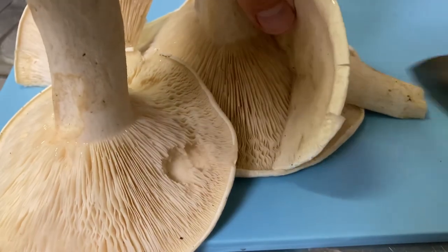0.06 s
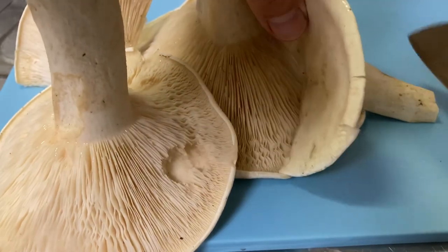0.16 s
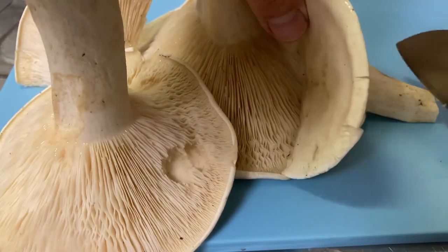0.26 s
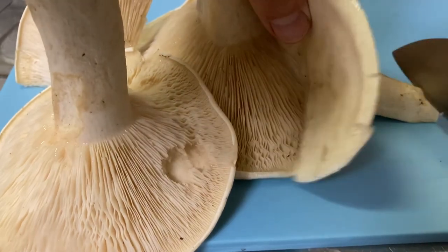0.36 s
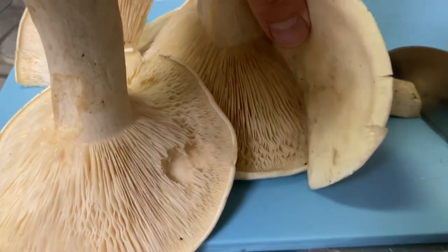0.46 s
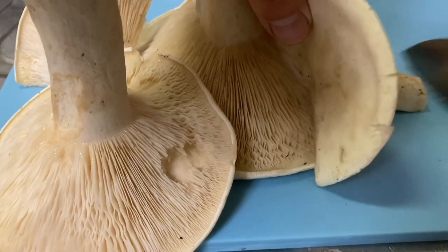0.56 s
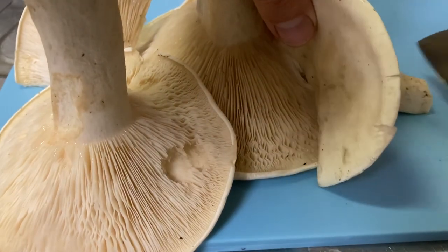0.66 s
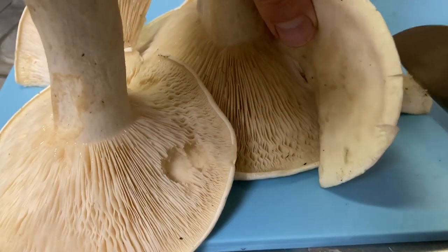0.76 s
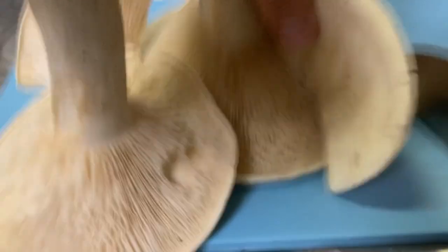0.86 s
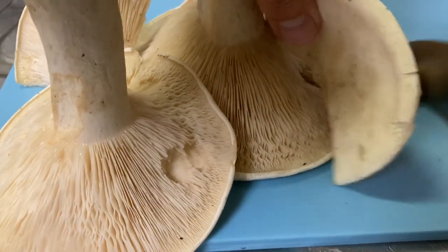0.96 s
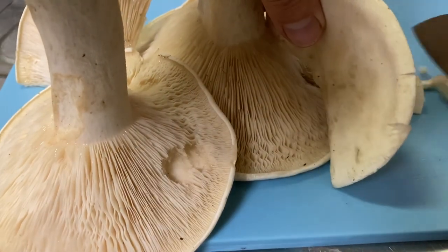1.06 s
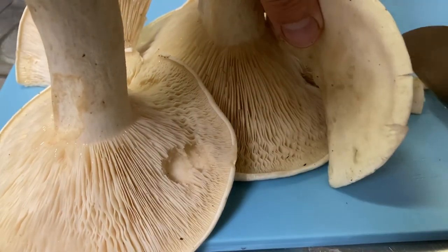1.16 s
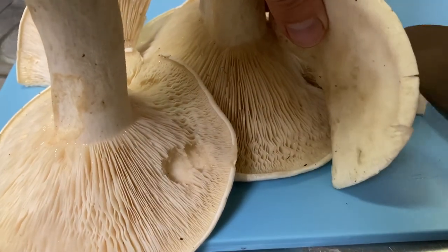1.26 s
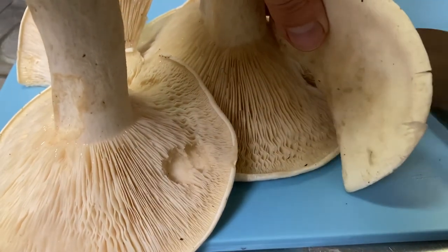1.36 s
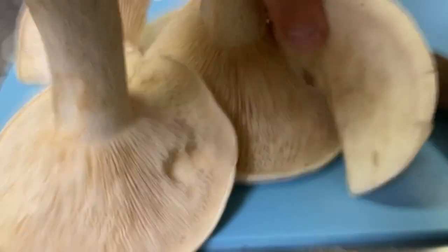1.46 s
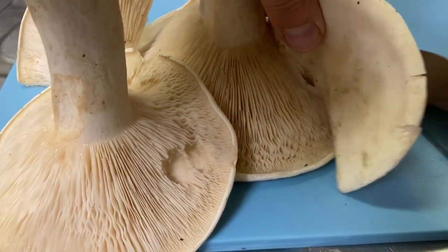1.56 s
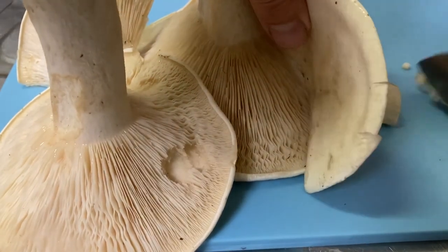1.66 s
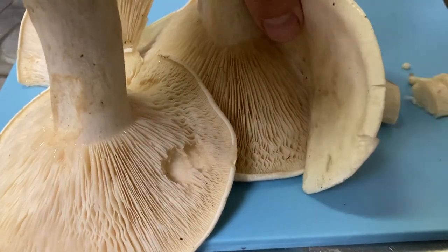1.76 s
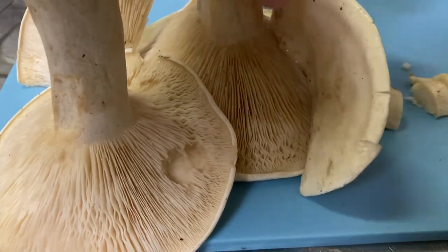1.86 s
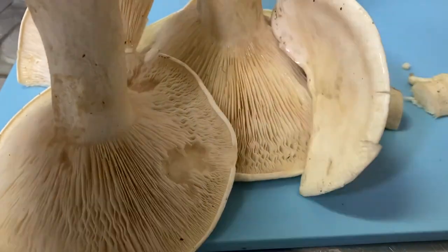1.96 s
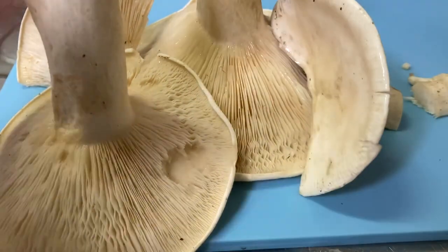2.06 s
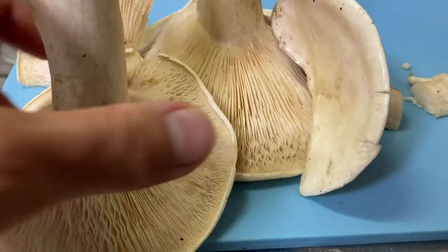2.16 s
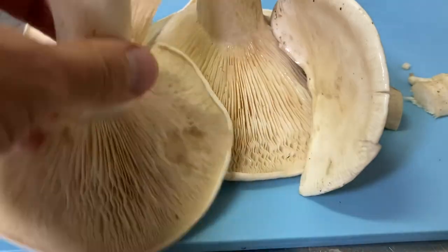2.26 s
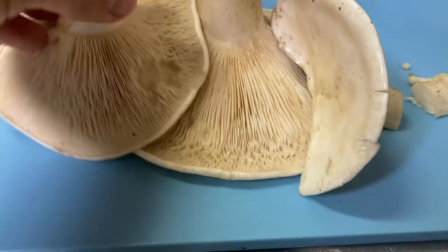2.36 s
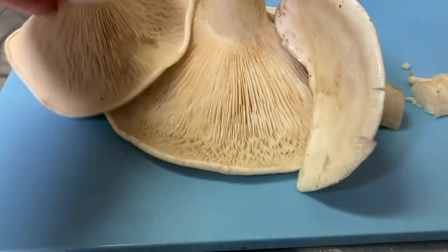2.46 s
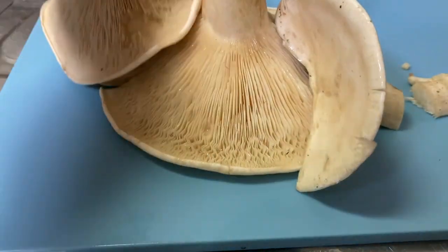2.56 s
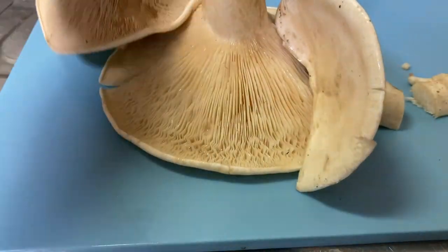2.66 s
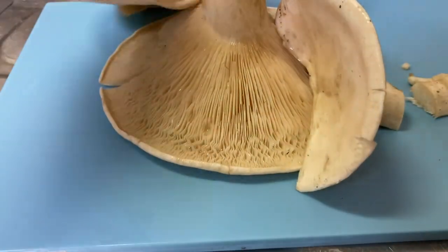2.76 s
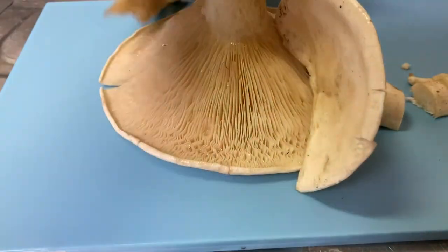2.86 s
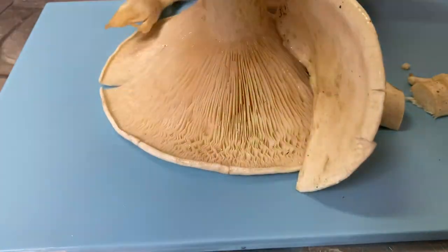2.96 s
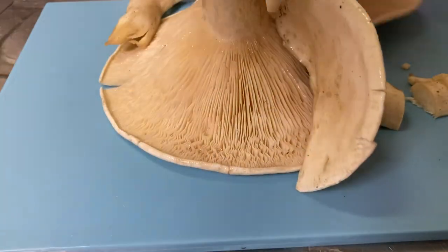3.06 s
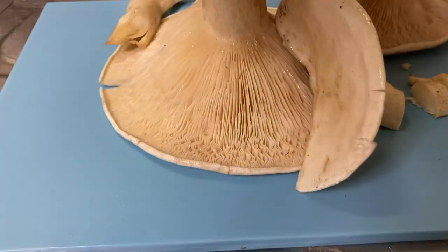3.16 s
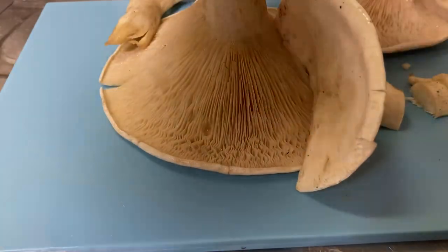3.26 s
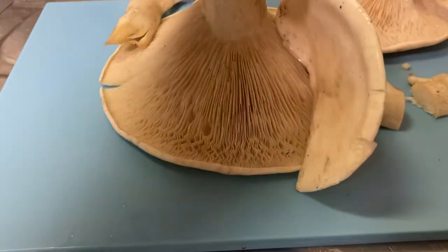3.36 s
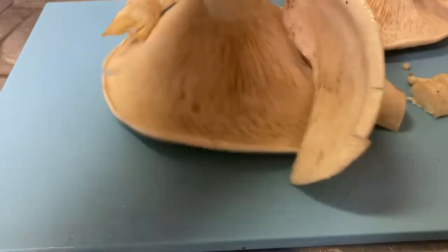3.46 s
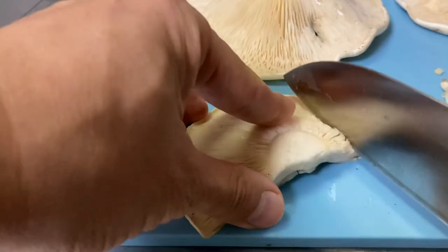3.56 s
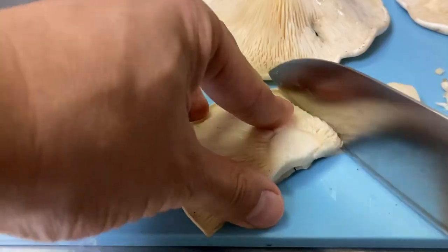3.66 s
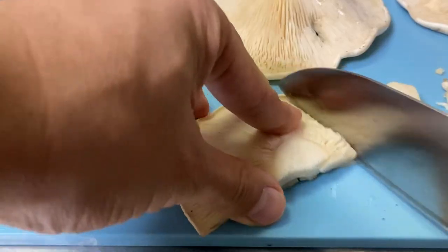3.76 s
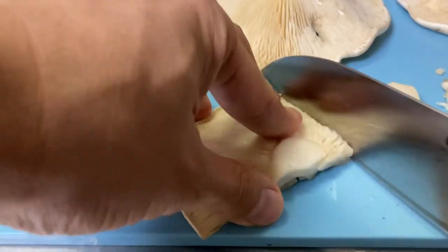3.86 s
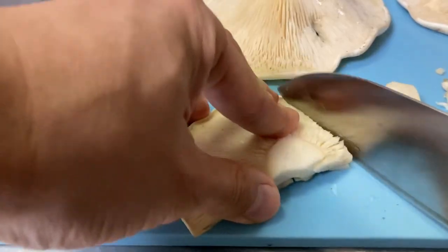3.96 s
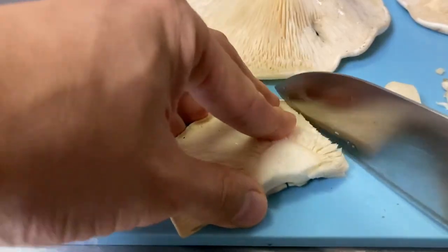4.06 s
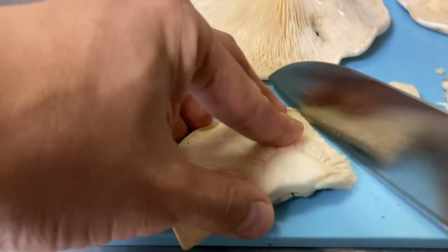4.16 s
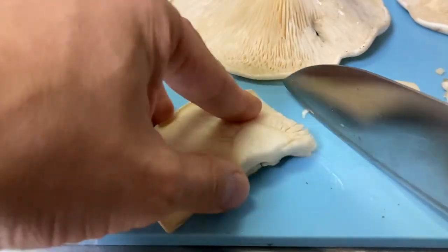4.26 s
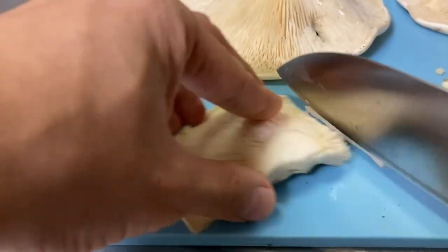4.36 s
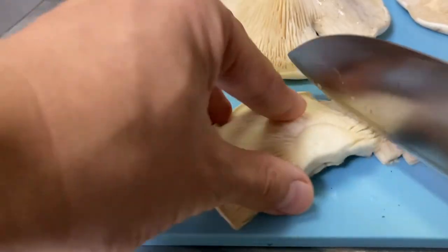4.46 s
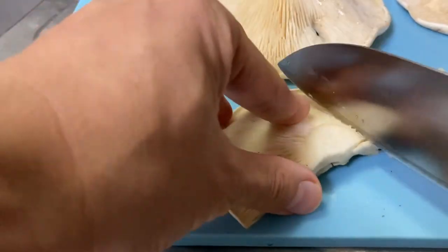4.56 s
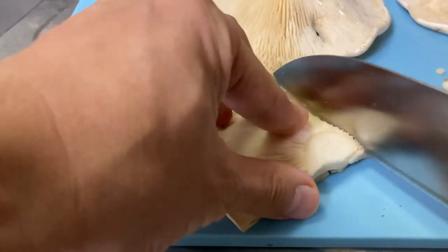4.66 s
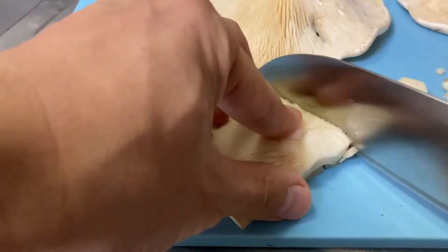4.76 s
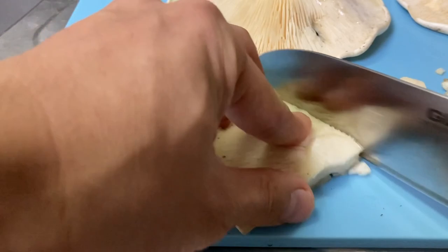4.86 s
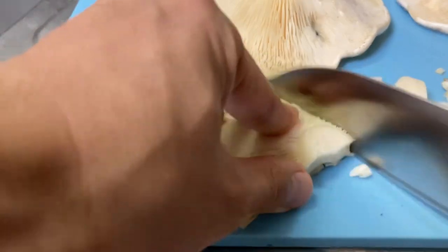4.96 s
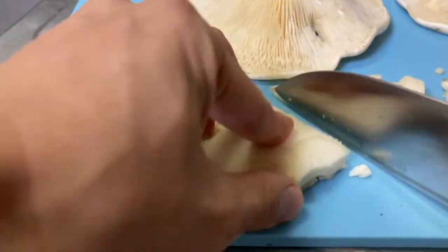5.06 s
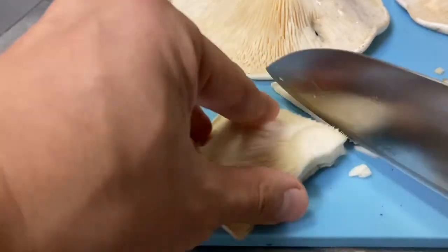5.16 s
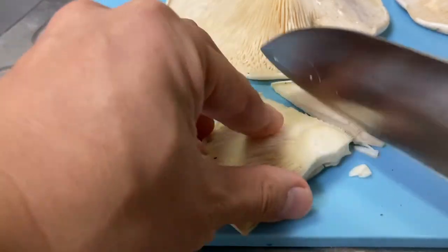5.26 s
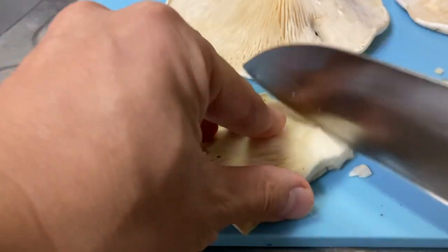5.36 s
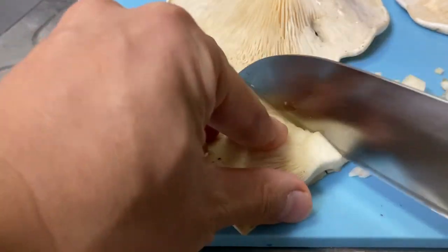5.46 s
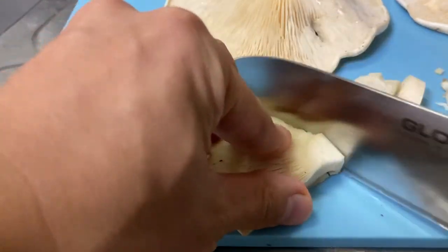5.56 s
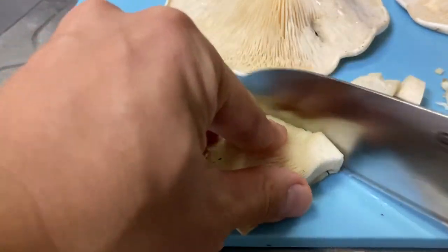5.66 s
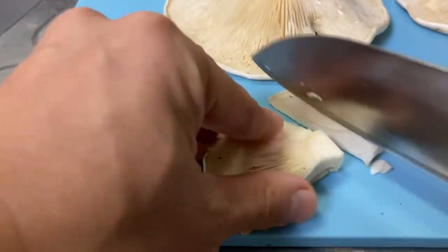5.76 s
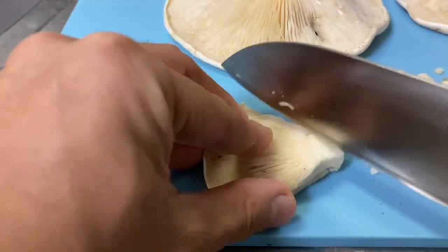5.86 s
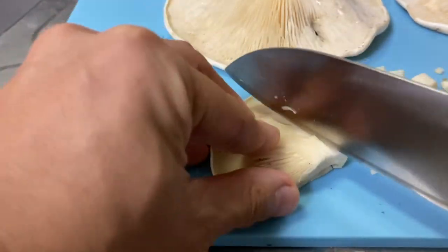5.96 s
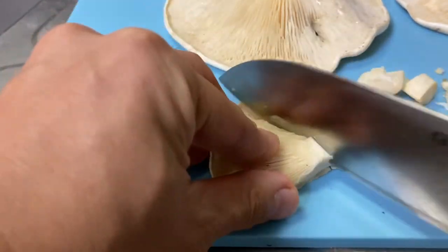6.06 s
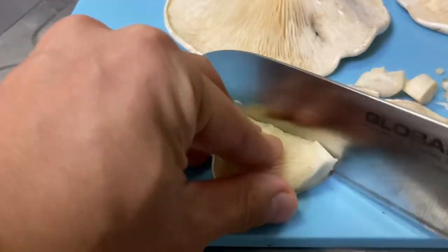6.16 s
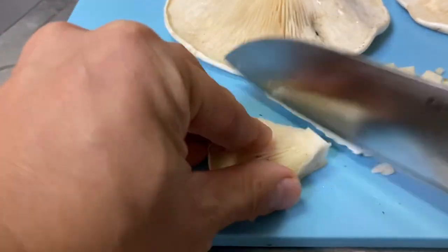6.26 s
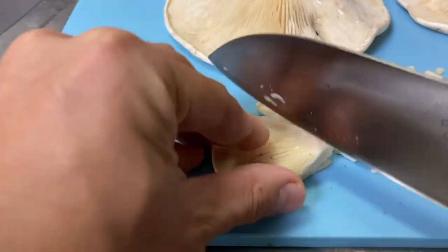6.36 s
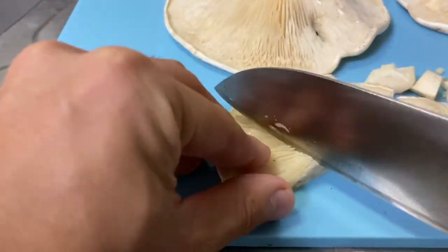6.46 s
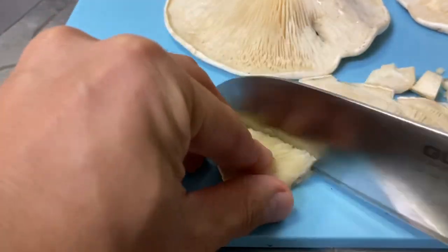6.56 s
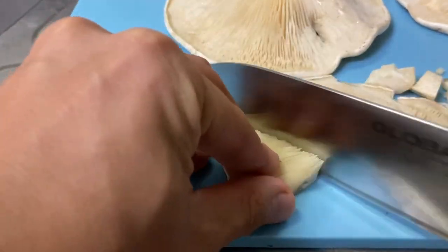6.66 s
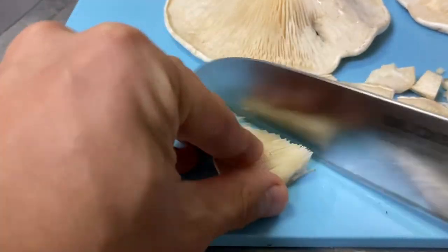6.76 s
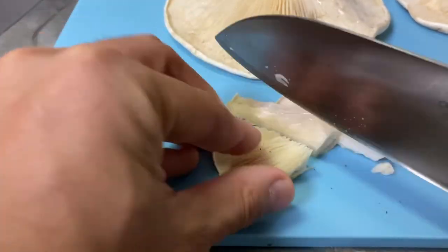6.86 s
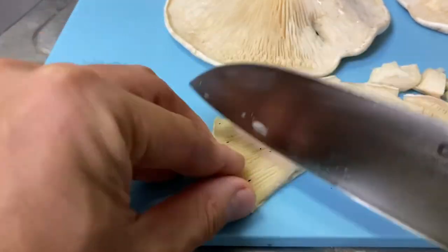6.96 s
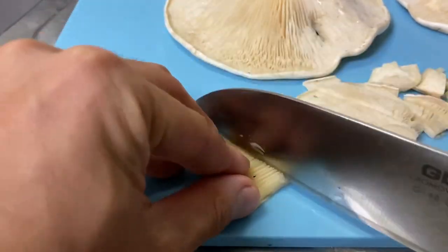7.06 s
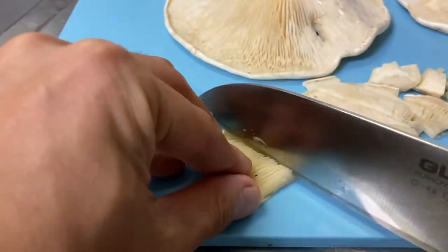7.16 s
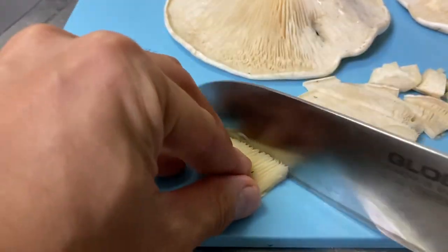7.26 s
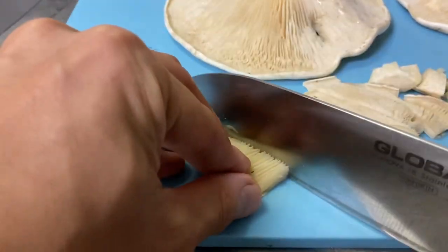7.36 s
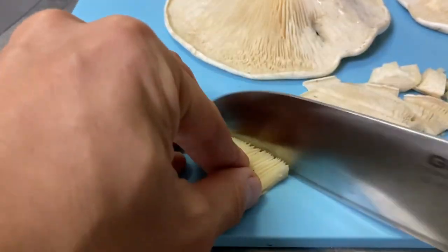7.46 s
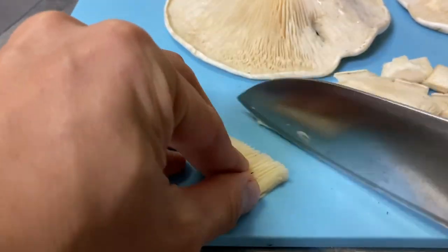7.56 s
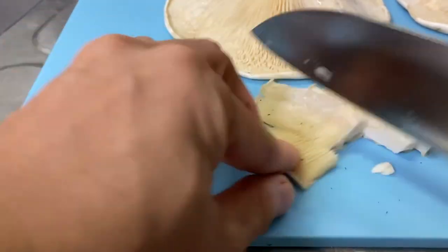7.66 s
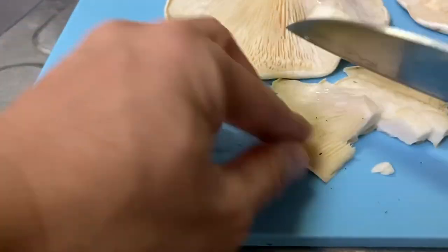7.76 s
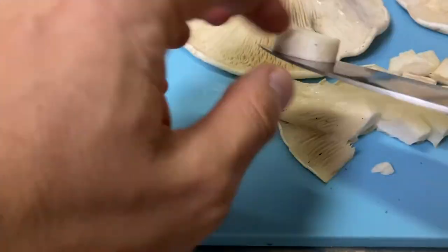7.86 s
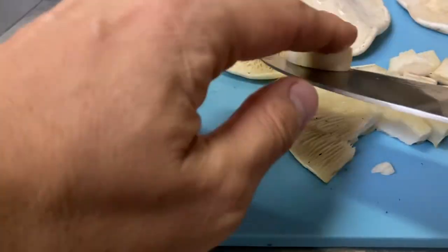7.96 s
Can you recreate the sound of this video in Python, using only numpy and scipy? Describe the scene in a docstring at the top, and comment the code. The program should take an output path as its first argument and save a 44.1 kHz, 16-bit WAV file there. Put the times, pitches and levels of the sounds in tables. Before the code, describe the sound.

A ringing knife chops hard on a plastic cutting board, rests over faint fridge hum, then slices mushroom with soft crunches, knocks and short scrapes.

```python
"""Slicing mushrooms on a plastic board

A chef's knife works close by in a small quiet kitchen: the ring of an earlier cut, then three hard
chops near the board's edge and six slices towards its middle. Blows excite decaying modes of board and
blade; stick-slip noise makes the dragging hiss and short creak; random grains make the flesh crunch.
Fingers shift the caps between the runs, the level dips briefly, and a refrigerator hums throughout."""
import sys
import numpy as np
from scipy import signal
from scipy.fft import rfft, irfft, next_fast_len
from scipy.io import wavfile
from scipy.ndimage import uniform_filter1d, map_coordinates

SR = 44100
rng = np.random.default_rng(int(sys.argv[2]) if len(sys.argv) > 2 else 0)


def dump(signal):
    """Clip the signal to [-1, 1] and save it as 16-bit WAV at the path in sys.argv[1]."""
    limited = np.clip(np.atleast_2d(signal).T, -1, 1)
    pcm = np.round(limited * 32767).astype(np.int16)
    wavfile.write(sys.argv[1], SR, pcm)


N = 353682
TIME = np.arange(N) / SR  # s, the whole scene
AGE = TIME[:SR * 3 // 4]  # s, since a single blow


def amp(db):
    """Level to gain: 20 dB is a factor of ten in amplitude."""
    return 10 ** (np.asarray(db) / 20)


def unit(x):
    """Normalisation by mean power: scale to rms 1."""
    return x / np.sqrt(np.mean(x ** 2) + 1e-20)


def strength(x):
    """Energy equivalence: the rms of a blow if all its energy fell into 10 ms."""
    return np.sqrt(np.sum(x ** 2) / (SR / 100))


def full(sound):
    """Energy normalisation: a short sound at unit strength, followed by silence."""
    return np.pad(sound / strength(sound), (0, len(AGE) - len(sound)))


def along(points, hz):
    """Logarithmic frequency scale: interpolate (frequency [Hz], value) points."""
    point_hz, values = np.transpose(points)
    return np.interp(np.log(hz + 1), np.log(point_hz), values)


def filtered(x, response):
    """Linear filtering: multiply the spectrum of x by a response of frequency."""
    n = x.shape[-1]
    padded = next_fast_len(n + SR // 8)
    spectrum = rfft(x, padded) * response(np.fft.rfftfreq(padded, 1 / SR))
    return irfft(spectrum, padded)[..., :n]


def coloured(x, spectrum):
    """Spectral shaping: give x a (frequency [Hz], level [dB]) colour, at rms 1."""
    return unit(filtered(x, lambda hz: amp(along(spectrum, hz))))


def wobble(rate):
    """Slow random modulation: a smooth curve with this many random knots a second."""
    coarse = TIME[::32]
    knots = rng.standard_normal(int(N * rate / SR) + 4)
    return np.interp(TIME, coarse, map_coordinates(knots, [coarse * rate]))


def grains(rate, spread_db):
    """Poisson-like impulses: tiny slips at random moments, of very unequal size."""
    happens = rng.random(N) < rate / SR
    return unit(happens * rng.standard_normal(N) * amp(spread_db * rng.standard_normal(N)))


def patchy(x, depth_db):
    """Moving contact point: narrow resonances come and go, as a smoothed random gain over time and pitch."""
    z = signal.stft(x, nperseg=512)[2]
    field = uniform_filter1d(rng.standard_normal(z.shape), size=2, axis=0)
    field = uniform_filter1d(field, size=5, axis=1)
    return unit(signal.istft(z * amp(depth_db * unit(field)), nperseg=512)[1][:N])


SWELL_SHAPE = 1.5  # flank of every swell: 1 pointed, 2 rounded


def swell(s, rise, fall, hold=0):
    """Envelope: peaks at s for the hold time, 20 dB down one rise before and one fall after."""
    away = np.maximum((s - TIME) / rise, 0) + np.maximum((TIME - s - hold) / fall, 0)
    return amp(-20 * np.minimum(away, 10) ** SWELL_SHAPE)


def add(track, s, sound):
    """Superposition: mix a sound into a track at time s."""
    start = round(s * SR)
    part = sound[..., max(-start, 0):N - start]
    track[..., max(start, 0):max(start, 0) + part.shape[-1]] += part


# likeness of left and right in diffuse sound: (frequency [Hz], correlation [-1 to 1])
LIKENESS = [(30, .5), (100, .92), (300, 0.39), (700, 0.55), (1300, 0.038), (16000, 0.061)]


def diffuse(n):
    """Diffuse-field coherence: stereo noise from all sides, alike in the bass, nearly unrelated in the treble."""
    def mid_and_side(hz):
        turn = np.arccos(np.clip(along(LIKENESS, hz), -1, 1)) / 2
        return np.array([np.cos(turn), np.sin(turn)])
    mid, side = filtered(rng.standard_normal((2, n)), mid_and_side)
    return np.array([mid + side, mid - side])


# decay of the kitchen's reverberation: (frequency [Hz], t60 [s])
KITCHEN_DECAY = [(100, 0.18), (300, 0.54), (700, .36), (2000, .28), (5000, 0.29), (13000, 0.15)]


def in_kitchen(x, near_db, room_db, sent=None, near_t60=0.058, gap=.005, uneven_db=4, turn=0.54):
    """Reverberation: direct sound at two close microphones, early counter echoes and a decaying room tail."""
    t = AGE[:SR // 3]
    hz, frame, z = signal.stft(diffuse(len(t)), SR, nperseg=256)
    decayed = z * amp(-60 * frame / along(KITCHEN_DECAY, hz)[:, None])
    tail = signal.istft(decayed, SR, nperseg=256)[1][:, :len(t)]
    # a few of the early echoes stand out from the rest
    uneven = np.repeat(rng.standard_normal(len(t)), 32)[:len(t)]
    near = diffuse(len(t)) * amp(uneven_db * uneven - 60 * t / near_t60)
    echo = amp(near_db) * near / np.linalg.norm(near[0]) + amp(room_db) * tail / np.linalg.norm(tail[0])
    echo = np.pad(echo, ((0, 0), (round(gap * SR), 0)))
    # short waves reach the two microphones out of step
    sides = np.array([[1], [-1]])
    direct = filtered(x, lambda hz: np.exp(1j * turn * np.tanh(hz / 1200) * sides))
    outward = x if sent is None else sent
    return direct + signal.fftconvolve(outward[None], echo, axes=1)[:, :len(x)]


# fibres giving way, relative colour: (frequency [Hz], level [dB])
TEAR_COLOUR = [(60, 3.5), (170, 10), (600, 0.5), (2200, -1), (4500, -3), (7000, -13), (16000, -19.5)]
# knife meets board: (time [s], level [dB], extra thump below about 300 Hz [dB], relative crack [dB],
#   blade ring relative to knock [dB], spot [0 edge - 1 middle], fizz of the flesh just before [dB])
CHOPS_PLAYED = [(-.1, -15, 2.5, -7, -1.5, 0.059, -90), (0.4467, -16.5, 1, -6, 2.5, 0, -81.5),
                (0.8668, -11, 0.5, 3, 3, 0, -79.5), (1.4613, -10.5, 0.5, 4, 1, 0, -78),
                (3.8352, -19.5, -2, -6.5, -5, 0.64, -80), (4.848, -18, -9, -1.5, -6.5, 0.5, -65),
                (5.5528, -18.5, -2.5, 1.5, -3, 1, -58), (6.1041, -14, -0.5, 2, -10.5, 0.61, -59),
                (6.6000, -26.5, -3, -3.5, -4, 0.91, -57.5), (7.2462, -23, 1, -4, -5, 0.96, -74)]


def chops(tear_t60=.017):
    """Impact excitation: the last fibres tear in a quick swell, then the edge hits the board and the knife rings."""
    out = np.zeros((2, N))
    before = AGE[:SR // 25][::-1]  # s left until the blow
    for s, db, thump_db, crack_db, ring_db, spot, _ in CHOPS_PLAYED:
        knock = board(spot, thump_db)
        snap = amp(crack_db - 12.5 - 4.894 * spot) * crack(t60=.03)
        blow = knock + snap + amp(ring_db) * blade()
        tear_noise = coloured(rng.standard_normal(len(before)), TEAR_COLOUR)
        tear = amp(-9 - 10 * spot - 60 * before / tear_t60) * tear_noise
        # sent outwards: the blow to all sides, and the knock again 10 ms later
        sent = amp(-2) * clap(thump_db, treble_db=crack_db + 3 - 7 * spot)
        sent = sent + amp(-6) * np.roll(knock, SR // 100)
        sent = np.pad(sent, (len(before), 0))
        sound = in_kitchen(np.concatenate([tear, blow]), near_db=-6.5, room_db=-9.0, sent=sent)
        add(out, s - before[0], amp(db) * sound)
    return out


# board modes, relative levels: (frequency [Hz], t60 [s], struck at the edge [dB], struck in the middle [dB])
BOARD_MODES = [(166, 0.075, -7.5, -2), (294, 0.07, -8.5, -13), (401, 0.051, -14, -7.5),
               (474, 0.06, -16, -9), (659, 0.063, -1.5, 0.5), (774, .06, -5, -5), (899, 0.15, -10.5, -9.5),
               (1010, .04, -8.5, -7), (1213, .04, -11.5, -12.5), (1480, .045, -9, -8),
               (1775, 0.038, -3, -13), (2034, 0.052, 2, -5.5), (2275, 0.03, -3, -10), (2847, .022, -8, -1),
               (3650, 0.012, -4.5, -12.5), (4380, 0.015, 2, -19), (5614, 0.0056, -11, -15.5)]


def board(spot, thump_db, soft_hz=np.inf, travel=.0007, scatter_db=3.5, detune=.012):
    """Modal synthesis with dispersion: bending waves are slower in the bass, so the knock chirps downwards."""
    hz, t60, edge_db, middle_db = np.transpose(BOARD_MODES)[:, :, None]
    chance = rng.standard_normal((2, len(BOARD_MODES), 1))
    db = edge_db + spot * (middle_db - edge_db) + scatter_db * chance[0]
    db = db + thump_db / (1 + (hz / 300) ** 4)
    t = np.maximum(AGE[:SR // 10] - travel * np.sqrt(1000 / hz), 0)
    sign = (-1) ** np.arange(len(BOARD_MODES))[:, None]
    modes = sign * amp(db - 60 * t / t60) * np.sin(2 * np.pi * hz * (1 + detune * chance[1]) * t)
    # a soft contact excites little above soft_hz
    return full(np.sum(modes / (1 + (hz / soft_hz) ** 4), axis=0))


# colour of a sharp contact: (frequency [Hz], relative level [dB])
CRACK_COLOUR = [(300, -19), (1500, -3), (4000, -2), (6500, -1), (8500, -7), (11000, -13), (14000, -7.5),
                (16000, -11)]


def crack(t60):
    """Short contact time: sharp steel gives a burst of broadband treble that dies at once."""
    t = AGE[:SR // 20]
    return full(coloured(rng.standard_normal(len(t)), CRACK_COLOUR) * amp(-60 * t / t60))


# blade and handle modes: (frequency [Hz], level before scatter [dB], t60 [s])
BLADE_MODES = [(276, -21, 0.76), (379.5, -30, 0.44), (474, -38, .4), (664, -28, .3), (820, -30.5, 0.19),
               (1220, -34, .4), (1540, -39.5, 0.32), (3330, -36.5, .2), (3566, -39.5, .23),
               (4240, -39.5, 0.23)]


def blade():
    """Free vibration: the knife and its handle ring at new strengths after each blow."""
    hz, db, t60 = np.transpose(BLADE_MODES)[:, :, None]
    db = db + 0.63 * rng.standard_normal(db.shape)
    return np.sum(amp(db - 60 * AGE / t60) * np.sin(2 * np.pi * hz * AGE), axis=0)


# a chop as it spreads to all sides: (frequency [Hz], relative level [dB])
SPREAD_COLOUR = [(25, -25), (60, -15), (165, 2), (230, -6), (420, -2), (560, -5.5), (680, -3), (1000, 0),
                 (1500, -3), (2050, -5), (2700, -12.5), (4300, -14.5), (8000, -20.5), (11000, -26.5),
                 (16000, -31.5)]


def clap(thump_db, treble_db, size=2048):
    """Minimum phase: one causal pulse with the smooth colour of a chop heard from all directions."""
    hz = np.fft.rfftfreq(size, 1 / SR)
    db = along(SPREAD_COLOUR, hz)
    db = db + thump_db / (1 + (hz / 300) ** 4) + treble_db / (1 + (2500 / (hz + 1)) ** 2)
    # folding the cepstrum onto positive times makes the pulse causal
    cepstrum = irfft(np.log(amp(db)))
    return full(irfft(np.exp(rfft(2 * cepstrum[:size // 2], size))))


# mains lines, mean level: (frequency [Hz], level [dB])
MAINS_HUM = [(118.5, -56), (237, -78.5), (474, -76.5)]
# compressor whine, mean level: (time [s], level [dB])
WHINE_LEVEL = [(0, -78), (2.75, -80), (3.05, -75.5), (3.45, -83.5), (3.6, -90), (4.4, -87), (8, -82)]
# rush of the room, relative colour: (frequency [Hz], level [dB])
AIR_COLOUR = [(25, -17), (60, -6.5), (100, 6), (170, 2), (250, -12.5), (470, -12.5), (700, -19),
              (1200, -28), (2050, -24), (2350, -22), (2700, -34), (6000, -37.5), (16000, -44.5)]
AIR_DB = -61.5  # mean level of the rush


def refrigerator():
    """Drifting line spectrum over noise: mains hum, a thin compressor whine and the rush of the room."""
    def line(hz, drift):  # drift in Hz
        return np.sqrt(2) * np.sin(2 * np.pi * np.cumsum(hz + drift * wobble(2.3)) / SR)
    hum = sum(amp(db + 1.2 * wobble(5.2)) * line(hz, drift=0.86) for hz, db in MAINS_HUM)
    whine_db = np.interp(TIME, *np.transpose(WHINE_LEVEL)) + 1.2 * wobble(4.4)
    whine = amp(whine_db) * line(2368, drift=2.3)
    air = amp(AIR_DB + 1.5 * wobble(2.9)) * coloured(diffuse(N), AIR_COLOUR)
    return hum + whine + air


# rustle of the caps, relative colour: (frequency [Hz], level [dB])
RUSTLE_COLOUR = [(80, -1), (170, 7), (400, 11.5), (800, -8), (1500, -17), (3500, -25.5), (7000, -35),
                 (16000, -36.5)]
# fingers shift a cap over the board: (start [s], length [s], rustle before flutter [dB])
GRIPS_PLAYED = [(2.075, 0.42, -71.5), (2.794, 0.246, -82)]
# mushrooms and fingers bump the board: (time [s], level [dB], brightness [Hz])
BUMPS_PLAYED = [(.365, -49, 497), (0.399, -48, 265), (0.433, -32, 302), (0.769, -47.5, 200),
                (2.101, -60, 795), (2.265, -50.5, 250), (2.41, -58.5, 600), (2.859, -50, 246),
                (2.965, -55, 297), (3.545, -54, 500), (3.568, -49.5, 990), (4.615, -52.5, 400),
                (5.495, -53.5, 400), (5.767, -46, 900), (5.775, -43.5, 200), (6.066, -55, 450),
                (6.298, -45, 500), (6.48, -54, 406), (7.15, -58, 780), (7.97, -55.5, 500)]
GRIP_EDGE_S, GRIP_FLUTTER_DB = .07, 6  # a grip fades in and out by 20 dB; its pressure is uneven
HOLD_DB = -78  # rustle, before flutter, of the hand that steadies the mushroom all along


def handling():
    """Granular friction and soft impact: caps rustle under the fingers; bumps reach only low board modes."""
    pressure = sum(amp(db) * swell(s, GRIP_EDGE_S, GRIP_EDGE_S, hold=length) for s, length, db in GRIPS_PLAYED)
    rustle = patchy(coloured(grains(rate=550, spread_db=5.5), RUSTLE_COLOUR), depth_db=5)
    out = (pressure + amp(HOLD_DB)) * amp(GRIP_FLUTTER_DB * wobble(25)) * rustle
    for s, db, soft_hz in BUMPS_PLAYED:
        add(out, s, amp(db) * board(spot=.4, thump_db=1.0, soft_hz=soft_hz))
    return out


# colour of the hiss: (frequency [Hz], relative level [dB])
HISS_COLOUR = [(400, -21.5), (1100, 1), (1600, 0.5), (2050, 7), (2500, -2.5), (2900, -2.5), (4200, -6),
               (6000, -9.5), (8200, -6.5), (11000, -14), (13000, -5), (16000, -8)]
# board resonances shaken by the judder: (frequency [Hz], width [Hz], relative level [dB])
JUDDER_RESONANCES = [(450, 170, -9.5), (670, 80, 0.5), (790, 160, -4.5), (1010, 190, -7.5),
                     (1450, 350, -16)]
# the edge drags clear, one row a stroke: (start [s], rise [s], fall [s], hiss [dB], its extra treble [dB],
#   delay from the peak until the edge catches [s], judder [dB])
STROKES = [(.050, 0.013, 0.037, -30, -2.5, 0.011, -38.5), (.539, 0.0088, 0.0165, -31.5, -7.5, 0.0034, -35),
           (1.615, 0.017, 0.021, -44.5, 5, 0.013, -41), (4.208, .033, 0.033, -44.5, -2, 0.0016, -45),
           (5.044, 0.024, 0.034, -46.5, -6, -0.011, -39.5), (5.684, 0.018, 0.023, -41, 7.5, 0.0098, -36.5),
           (6.219, 0.0105, 0.013, -41.5, 6.5, 0.003, -43), (6.746, 0.023, 0.022, -42, -1, 0.0028, -36),
           (7.482, 0.037, 0.052, -41, 1.5, -0.0032, -36)]
TOUCH_DB, TOUCH_S = -11, .003  # a stroke starts this far under its peak, and this suddenly
CATCH_DB = -1.5  # creak relative to judder
SING_HZ, SING_DB, SING_T60 = 13000, -45, .22  # the first stroke sets the steel singing


def drags(jerk_db=1.5, treble_hz=5500):
    """Stick-slip friction: the edge hisses over the plastic, then catches and shakes the board's resonances."""
    def resonances(f):
        total = 0
        for k, (centre, width, db) in enumerate(JUDDER_RESONANCES):
            total = total + (-1) ** k * amp(db) * 1j * f * width / (centre ** 2 - f * f + 1j * f * width)
        return total

    grip = unit(amp(jerk_db * wobble(260)))
    hiss = patchy(coloured(grains(rate=4500, spread_db=2.5), HISS_COLOUR), depth_db=4.5)
    treble = filtered(hiss, lambda hz: 1 - 1 / (1 + (hz / treble_hz) ** 4))
    judder = patchy(filtered(grains(rate=1100, spread_db=1.5), resonances), depth_db=4)
    out = np.zeros(N)
    for start, rise, fall, hiss_db, treble_db, delay, judder_db in STROKES:
        peak = start + rise
        flank = rise * (20 / abs(TOUCH_DB)) ** (1 / SWELL_SHAPE)  # puts the start at TOUCH_DB
        rub = swell(peak, flank, fall) * (hiss + (amp(treble_db) - 1) * treble)
        shake = swell(peak + delay, flank, fall) * judder + amp(CATCH_DB) * creak(peak + delay)
        touch = np.clip((TIME - start) / TOUCH_S, 0, 1)
        out += touch * (amp(hiss_db) * rub + amp(judder_db) * shake)
    out *= grip
    singing = amp(SING_DB - 60 * AGE / SING_T60) * np.sin(2 * np.pi * SING_HZ * AGE)
    add(out, STROKES[0][0], singing)
    return out


CATCH_S, CATCH_HZ, CATCH_OCTAVES_PER_S = 0.016, 673, -9  # half length, mean pitch at its peak, fall
CATCH_SCATTER = 0.11  # octaves of pitch from one creak to the next


def creak(s):
    """Periodic stick-slip: the edge catches and slips regularly for a few cycles, ever slower."""
    fall = CATCH_OCTAVES_PER_S * np.clip(TIME - s, -2 * CATCH_S, 2 * CATCH_S)
    octaves = CATCH_SCATTER * rng.standard_normal() + fall
    tone = np.sqrt(2) * np.sin(2 * np.pi * np.cumsum(CATCH_HZ * 2 ** octaves) / SR)
    return swell(s, CATCH_S, CATCH_S) * tone


# fizz of bursting cells, relative colour: (frequency [Hz], level [dB])
FLESH_COLOUR = [(300, -20), (700, 7), (2000, 5.5), (3000, -3), (6000, 1), (10000, -7.5), (14500, 4),
                (16000, 1)]
# flesh squeezed or pushed off the blade: (time [s], fizz [dB], half length [s])
SQUEEZES_PLAYED = [(2.337, -73, 0.05), (2.423, -79, 0.032), (3.037, -86, .03), (3.953, -58, .048),
                   (4.143, -67, 0.072), (4.954, -57, 0.055), (5.675, -53.5, 0.04), (6.64, -62.5, .04),
                   (6.69, -66.5, 0.071), (7.024, -79, .03), (7.282, -65, 0.036), (7.456, -53, 0.049)]
# fibres snap, the blade ticks: (time [s], level [dB])
TICKS_PLAYED = [(0.3626, -58.5), (0.4308, -47.5), (0.542, -60), (2.6554, -70), (4.0235, -63.5),
                (4.043, -69), (5.131, -69.5), (5.3706, -74.5), (7.148, -71.5), (7.8286, -77)]
ENTRY_S, STOP_S = .065, .015  # the fizz grows by 20 dB as the blade sinks in, and stops at the board


def flesh():
    """Acoustic emission: cells burst in a fine fizz before chops and under squeezes; now and then a fibre snaps."""
    entry = sum(amp(fizz_db) * swell(s, ENTRY_S, STOP_S) for s, *_, fizz_db in CHOPS_PLAYED)
    squeeze = sum(amp(db) * swell(s, half, half) for s, db, half in SQUEEZES_PLAYED)
    fizz = (entry + squeeze) * coloured(grains(rate=3500, spread_db=0), FLESH_COLOUR)
    for s, db in TICKS_PLAYED:
        add(fizz, s, amp(db) * crack(t60=0.022))
    return fizz


DIP_S, DIP_DB = 3.583, -37  # moment and depth of the dip
DIP_FALL_S, DIP_RECOVER_S = 0.0022, .011  # its time constants


def scene():
    """Superposition: all sources together; the level dips briefly between the two runs of cuts."""
    small = in_kitchen(drags() + flesh() + handling(), near_db=-6.0, room_db=-14.0)
    nearness = np.exp(np.minimum((TIME - DIP_S) / DIP_FALL_S, (DIP_S - TIME) / DIP_RECOVER_S))
    return amp(DIP_DB * nearness) * (chops() + small + refrigerator())


TOP_HZ = 16250  # band limit


def record(dry, low_hz=66, top=0.86):
    """Transducer limits: the microphone loses deep bass, rounds the highest peaks and stops at its band limit."""
    x = filtered(dry, lambda hz: (1j * hz / (low_hz + 1j * hz)) ** 2)
    x = x / (1 + np.abs(x / top) ** 8) ** (1 / 8)
    return filtered(x, lambda hz: 1 / (1 + (hz / TOP_HZ) ** 90))


dry = scene()
out = record(dry)
dump(out)
```